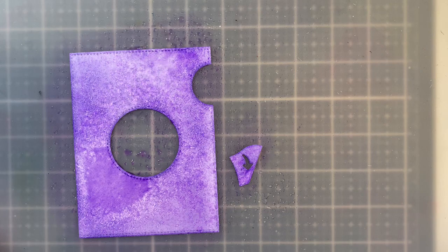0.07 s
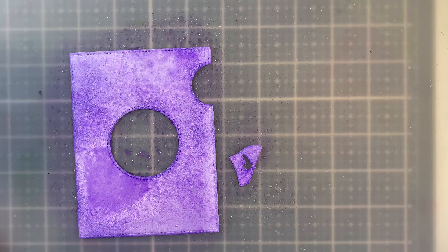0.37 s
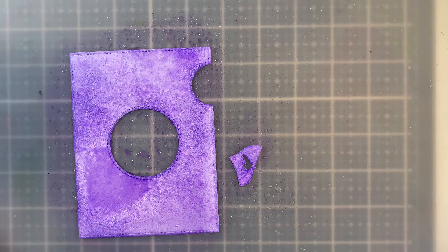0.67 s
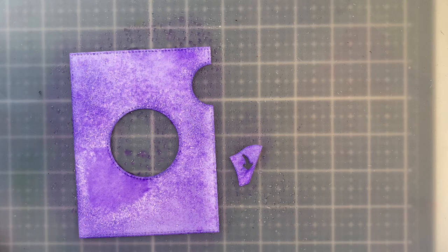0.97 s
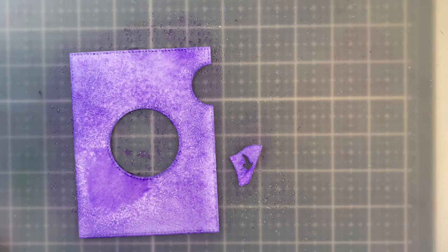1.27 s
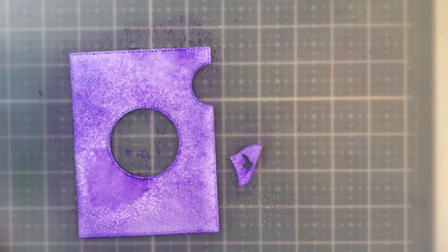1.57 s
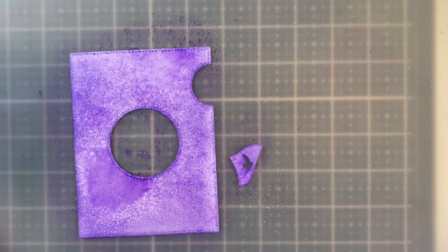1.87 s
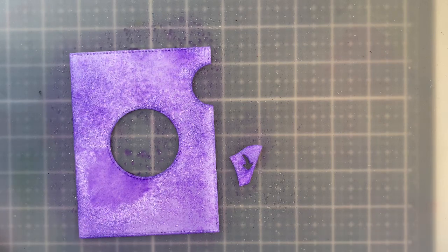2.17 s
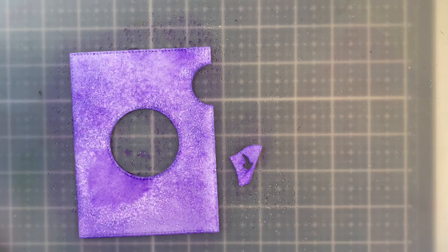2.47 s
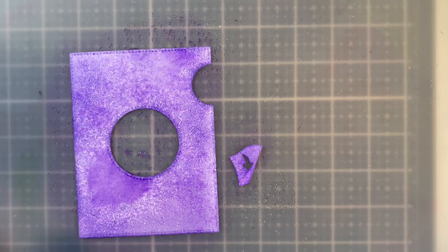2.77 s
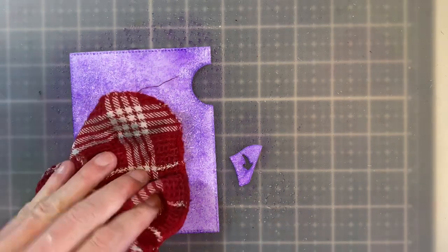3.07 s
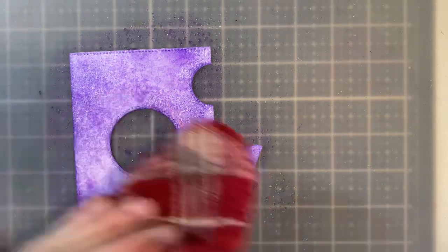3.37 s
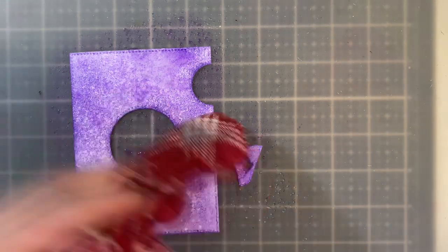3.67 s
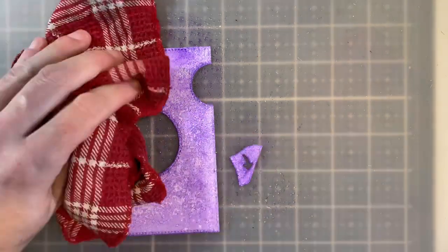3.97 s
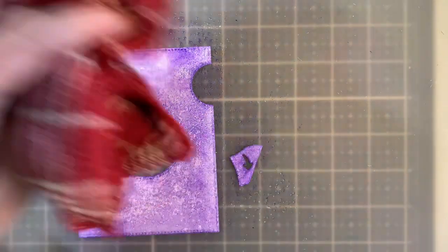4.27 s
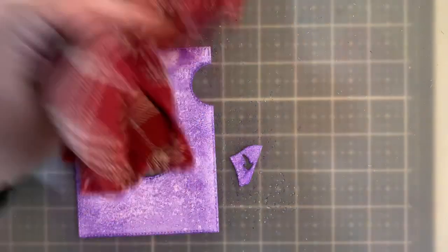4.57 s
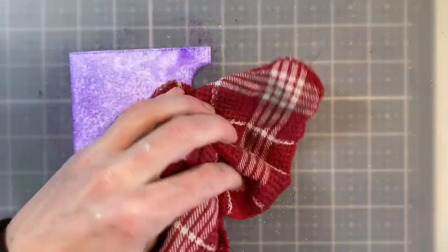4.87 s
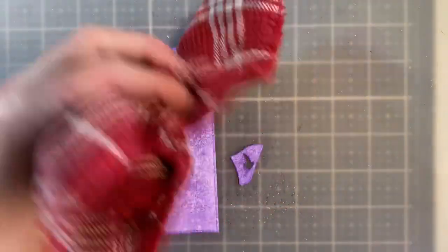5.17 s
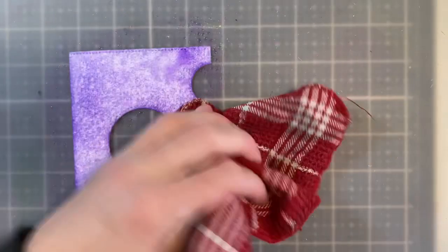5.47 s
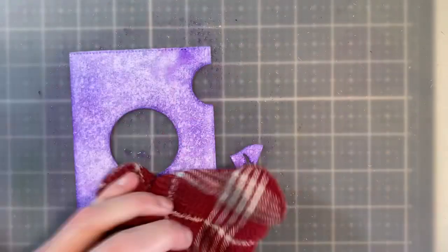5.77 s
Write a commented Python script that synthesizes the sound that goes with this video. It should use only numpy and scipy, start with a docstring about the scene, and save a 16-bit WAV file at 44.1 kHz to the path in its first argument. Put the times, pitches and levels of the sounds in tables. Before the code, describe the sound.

Tools are put down on a work table with a loud thud, followed by seven muffled pats of cloth and faint rustling.

```python
"""Light clicks and knocks sound as tools are put down on a work table in a small room; at one second
a heavy blow sends a bending wave through the top and sets its modes ringing. Then a bunched cloth is
dabbed seven times onto card on a craft mat: each dab crushes the fibres and thumps the table.
Between the dabs, friction makes cloth and sleeve swish and snag in short strokes,
and the table rumbles faintly under the arm's weight."""
import sys
import numpy as np
from scipy import signal
from scipy.fft import rfft, irfft, next_fast_len
from scipy.io import wavfile
from scipy.ndimage import map_coordinates

SR = 44100
rng = np.random.default_rng(int(sys.argv[2]) if len(sys.argv) > 2 else 0)


def digitize_waveform(pressure):
    """Quantize a signal to 16-bit integers and store it at the path in sys.argv[1].

    Rows of a 2-D input are taken as channels; values are limited to [-1, 1].
    """
    field = np.atleast_2d(pressure).T
    bounded = np.clip(field, -1, 1)
    quanta = np.round(bounded * 32767).astype(np.int16)
    wavfile.write(sys.argv[1], SR, quanta)


N = 264688
TIME = np.arange(N) / SR
AGE = np.arange(SR // 2) / SR  # seconds since a contact

# spectra of a hard crack, the soft cloth wad and rubbed card: frequency_hz, level_db
CRACK = [(400, -11), (1500, 5), (2150, 6), (2800, 6.5), (3600, 4), (5000, 1), (8000, -8), (11000, -13.5),
         (13000, -25.5), (16000, -24)]
WAD = [(60, -49), (250, 12.5), (400, 9.5), (550, -0.5), (1000, -6.5), (2500, -34.5), (8000, -22)]
CARD = [(300, -39), (780, -10.5), (1200, 1.5), (1750, -0.5), (2050, 3.5), (2400, -15), (3000, -9),
        (3450, -0.5), (3900, -8), (8000, -33)]
# left-right likeness of direct and of diffuse sound: frequency_hz, correlation
DIRECT = [(60, 1), (150, 1), (300, 0.31), (700, 0.22), (1400, 0.81), (3000, 0.083), (7000, 0.1),
          (15000, 0.49)]
DIFFUSE = [(60, 0.6), (150, .93), (300, 1), (650, 0.35), (1400, -.15), (3000, -0.78), (15000, 1)]


def blow(start_s=0.9872, level_db=-11, dispersion=0.22, right_lag_s=0.00044):
    """Dispersion: a heavy tool's bending wave arrives treble first, as a fast falling sweep."""
    # spectrum of the impact: frequency_hz, level_db
    spectrum = [(25, -39), (70, -12.5), (125, 1), (165, 0), (230, -9.5), (350, -8), (560, -16.5),
                (880, -13), (1300, -34), (2000, -49.5), (6000, -92.5)]
    hz = np.fft.rfftfreq(len(AGE), 1 / SR)
    phase = 4 * np.pi * dispersion * np.sqrt(hz)  # group delay = dispersion / sqrt(hz)
    phase = phase + 2 * np.pi * hz * right_lag_s * np.array([[0], [1]])
    wave = irfft(amp(along(spectrum, hz)) * np.exp(-1j * phase), len(AGE))
    sweep = peaked(wave * np.cos(np.pi * AGE) ** 2)
    modes = peaked(table_modes(low_hz=60, high_hz=4000) * onset(0.0056))
    rattle = noise(CRACK, DIFFUSE, len(AGE), grit=0.26) * fade(AGE, 0.3)  # scattered round the room
    out = np.zeros((2, N))
    add(out, start_s, room(sweep, wet_db=-15))
    add(out, start_s + 0.0091, amp(-13) * modes + amp(-37) * rattle)
    return amp(level_db) * out


def knocks():
    """Impact excitation: a contact clacks, cracks and rings the modes, then its weight thumps."""
    # tools knocking on the mat, and the cloth slapping the card:
    # start_s, level_db, clack_hz, treble_db, rise_s, thump_db, swing_hz
    contacts = [(0.134, -40, 370, -21, 0.0022, -36.5, 228), (0.153, -48, 523, -8.5, 0.0022, -35, 213),
                (0.920, -43, 616.5, -5, 0.0044, -35, 210.3), (0.946, -43, 600, -9, 0.005, -31, 200),
                (0.973, -38, 597, -15, 0.0023, -30, 170), (0.993, -20.5, 948, -10.5, .0015, -35.5, 300),
                (1.169, -42.5, 650, -17.5, 0.00804, -29, 135),
                (1.203, -38.5, 680, -21.5, 0.0017, -31, 179.4),
                (1.401, -49.5, 740, -19.5, 0.0041, -38, 140),
                (1.574, -55.5, 616, -31.5, .013, -44.5, 139.4),
                (1.825, -45.5, 1120, -45, 0.0044, -53.5, 257),
                (1.843, -47.5, 1146, -45, 0.0039, -52, 209.6), (1.881, -54.5, 920, -29, 0.0027, -48.5, 204),
                (2.243, -42, 762, -28, 0.00072, -48, 86), (2.851, -48.5, 757, -1, 0.0017, -58.5, 120)]
    # spectrum of the dull clack: pitch_ratio, level_db
    clack_shape = [(.1, -15.5), (.3, -2.5), (.6, 0), (1.2, -2.5), (1.7, -12), (2.6, -21.5), (5, -40),
                   (12, -74.5)]
    out = np.zeros((2, N))
    for start_s, level_db, clack_hz, treble_db, rise_s, thump_db, swing_hz in contacts:
        # a softer contact lasts longer and its weight reaches the table later
        t60_s, thump_lag_s = 0.04 + 5.5 * rise_s, 2.1 * rise_s
        contact = peaked(fade(AGE, t60_s) * onset(rise_s))
        clack = amp(-6) * noise(pitched(clack_shape, clack_hz), DIFFUSE, len(AGE))
        crack = amp(treble_db - 6) * noise(CRACK, DIFFUSE, len(AGE), grit=0.54)
        modes = amp(-14) * peaked(table_modes(low_hz=378, high_hz=5000) * onset(0.0021))
        add(out, start_s, amp(level_db) * (room(contact * (clack + crack), wet_db=-8) + modes))
        weight = thump(swing_hz, ring_db=-10) + amp(-23) * rocking()
        add(out, start_s + thump_lag_s, amp(thump_db) * weight)
    return out


def ticks(tonal_t60_s=0.032, tonal_below_hz=4000):
    """Damped resonance: tiny snaps of noise; the lower ones ring more purely the longer they last."""
    # tools, fingernails and card edges: start_s, level_db, pitch_hz, t60_s, left_over_right_db
    clicks = [(0.005, -47, 6150, 0.18, 0), (0.0729, -40, 2430, 0.018, -2), (0.0724, -43.5, 9700, 0.016, -2),
              (0.150, -53.5, 1946, 0.058, -2), (0.086, -45, 6860, .02, -4), (0.367, -51, 2120, 0.014, -4),
              (0.432, -55, 6350, 0.019, -7), (0.465, -62, 1880, 0.03, -6), (0.467, -64.5, 3400, .02, -15),
              (0.918, -46.5, 3720, 0.019, 6), (0.942, -46, 3750, .016, -4.5),
              (0.991, -23.5, 3460, 0.016, 4.5), (0.9935, -24, 7160, 0.0068, 1), (1.000, -33, 3657, .01, -4),
              (1.004, -47, 3480, 0.17, -7), (1.176, -50, 2514, 0.02, 0), (1.2336, -54, 1720, .012, -9),
              (1.303, -65, 2160, 0.054, -5), (1.403, -71, 4600, 0.066, -8), (1.416, -58, 3424, 0.043, -2.5),
              (2.669, -55, 2050, .049, -3), (2.8503, -38, 4730, 0.0091, -6), (3.318, -52, 806, 0.013, -1),
              (3.34, -46, 6580, 0.016, -3), (3.378, -55, 1950, 0.034, -4.5),
              (3.776, -57.5, 5150, 0.028, -8.5), (3.778, -50.5, 1650, 0.012, -7),
              (3.809, -48.5, 811, 0.024, -2), (3.831, -48, 3850, 0.0072, -10),
              (4.721, -54.5, 1500, .014, -3), (5.178, -45, 790, 0.012, -2.5),
              (5.187, -55.5, 1893, 0.021, -3), (5.662, -44.5, 2600, 0.0076, -2),
              (5.6646, -34.5, 5870, 0.00828, -5.5), (5.906, -54, 7500, .02, -6)]
    # spectrum of a snap: pitch_ratio, level_db
    snap_shape = [(.12, -28), (.5, -13), (.85, -2.5), (1, 2), (1.2, -4), (1.7, -17.5), (3, -31.5), (6, -56)]
    out = np.zeros((2, N))
    for start_s, level_db, pitch_hz, t60_s, pan_db in clicks:
        tone_share = 0.5 * min(t60_s / tonal_t60_s, 1) * (pitch_hz < tonal_below_hz)
        ping = np.sqrt(2) * np.sin(2 * np.pi * pitch_hz * AGE)
        snap = noise(pitched(snap_shape, pitch_hz), DIRECT, len(AGE))
        click = ((1 - tone_share) * snap + tone_share * ping) * fade(AGE, t60_s)
        add(out, start_s, amp(level_db - 6) * room(click * sides(pan_db), wet_db=-8))
    return out


def dabs(crest_s=0.15, release_s=0.013, lead_s=0.005):
    """Compression: fibres crackle ever louder until the wad is flat and the hand's weight lands."""
    # the cloth pressed flat: landing_s, crush_db, body_db, rise_s, thump_db, swing_hz, ring_db
    presses = [(2.88, -49, -11, 0.065, -40, 95.4, -4.5), (3.355, -47.5, 3.5, .009, -45, 118.2, -7.5),
               (3.845, -45.5, -2.5, .012, -36, 107, 6), (4.280, -52, 4, 0.031, -34.5, 142.4, 0),
               (4.745, -54.5, 6, 0.0149, -44.5, 198, -1), (5.2152, -50.5, 7, 0.013, -23, 190, -2),
               (5.680, -51.5, 6, 0.0144, -44.5, 134, 5)]
    # spectrum of crushed fibres: frequency_hz, level_db
    crush = [(200, 1), (1200, -1.5), (2500, -5.5), (5500, -3.5), (9000, -11.5), (15500, -10)]
    out = np.zeros((2, N))
    for landing_s, crush_db, body_db, rise_s, thump_db, swing_hz, ring_db in presses:
        pressure = np.exp(np.minimum((AGE - crest_s) / rise_s, (crest_s - AGE) / release_s))
        fibres = amp(-10) * noise(crush, DIRECT, len(AGE), grit=0.16)
        body = amp(body_db - 9) * noise(WAD, DIRECT, len(AGE))
        start_s = landing_s - lead_s - crest_s  # the fibres flatten just before the thump
        add(out, start_s, amp(crush_db) * room(pressure * (fibres + body), wet_db=-7))
        push = amp(crush_db + 4) * rocking()  # a harder crush pushes the table deeper
        add(out, landing_s, amp(thump_db) * thump(swing_hz, ring_db - 12) + push)
    return out


def thump(swing_hz, ring_db, width_cycles=0.92, glide=0.1, ring_rise_s=0.017):
    """Transient bending: the loaded top sags, swings about twice and leaves its low modes ringing."""
    # early echoes of the thump from the nearby wall and ceiling: delay_s, level_db
    reflections = [(0.0237, -14.5), (.031, -13.5)]
    cycles = swing_hz * AGE * np.array([[1], [2]])  # fundamental and octave
    phase = (1 + glide) * np.log1p(glide * cycles) / glide  # dispersion slows the swing
    envelope = cycles * np.exp(-(cycles / width_cycles) ** 2 / 2)
    fundamental, octave = -peaked(envelope * np.sin(2 * np.pi * phase))
    swing = fundamental + amp(-17) * octave
    ringing = amp(ring_db) * table_modes(low_hz=40, high_hz=239.2) * onset(ring_rise_s, power=2)
    echoes = sum(amp(db) * np.interp(AGE - delay_s, AGE, swing, left=0) for delay_s, db in reflections)
    return (room(swing, wet_db=-14) + ringing + echoes) * sides(0.88)


def table_modes(low_hz, high_hz, skew_hz=700):
    """Modal superposition: damped sines between two corners; higher ones differ more in stereo phase."""
    # modes of the table top: pitch_hz, level_db, t60_s
    modes = [(126.5, -4.5, 0.072), (151.54, 3, 0.36), (229, -6.5, 0.25), (249.6, -4.5, 0.27),
             (282, -6, 0.18), (353, -1.5, 0.2), (372, -7, 0.3), (450, -10.5, 0.28), (563.6, -12.5, .24),
             (614, -7.5, .22), (784, -20.5, 0.16), (794, -14.5, 0.043), (924, -14.5, .18),
             (1110, -22, 0.14), (1270, -20.5, 0.12), (1478, -22.5, .18), (1930, -19, .13),
             (2200, -18.5, 0.22), (2410, -33.5, .2), (3600, -33, .2)]
    hz, level_db, t60_s = np.transpose(modes)[:, :, None]
    strength, skew, phase = rng.standard_normal((len(modes), 3)).T[:, :, None]
    gain = amp(level_db + 2 * strength) / (1 + (hz / high_hz) ** 4) / (1 + (low_hz / hz) ** 2)
    envelope = gain * fade(AGE, t60_s)
    angle = 2 * np.pi * hz * AGE + phase
    offset = np.minimum(hz / skew_hz, 1) * skew
    return np.array([(envelope * np.sin(angle + side * offset)).sum(0) for side in (1, -1)])


def rocking(pitch_hz=52, rise_s=0.0061, t60_s=0.22):
    """Damped oscillation: the whole table rocks under a weight and soon settles."""
    return peaked(np.sin(2 * np.pi * pitch_hz * AGE) * fade(AGE, t60_s) * onset(rise_s))


def arm(lean_stretch=1.6):
    """Power summation: overlapping strokes give envelopes of sliding speed and weight on the table."""
    # strokes of cloth and sleeve: peak_s, swish_db, rise_s, fall_s, weight_db
    strokes = [(0.004, -57.5, 0.022, 0.025, -64), (0.615, -85.5, 0.013, .025, -73.5),
               (1.668, -79.5, 0.022, 0.026, -70), (1.906, -81, .05, .04, -62.5),
               (2.191, -70.5, 0.04, 0.086, -62), (2.43, -69.5, 0.11, .15, -64),
               (2.65, -68.5, 0.12, 0.018, -64.5), (2.83, -72, 0.0581, 0.038, -64.5),
               (3.08, -71, .07, 0.026, -75), (3.545, -74.5, 0.06, 0.027, -65.5),
               (3.72, -85.5, 0.078, .15, -72), (4.03, -70.5, 0.035, 0.016, -68),
               (4.22, -75, 0.2, 0.19, -64), (4.505, -68.5, 0.044, 0.021, -73),
               (4.588, -79.5, .03, 0.03, -63.5), (4.971, -76.5, 0.068, 0.064, -59.5),
               (5.45, -76, 0.091, 0.057, -70), (5.885, -72.5, 0.051, 0.056, -67)]
    speed_power, weight_power = np.zeros((2, N))
    for peak_s, swish_db, rise_s, fall_s, weight_db in strokes:
        speed_power += (amp(swish_db) * bell(peak_s, rise_s, fall_s)) ** 2
        lean = bell(peak_s, lean_stretch * rise_s, lean_stretch * fall_s)  # outlasts the slide
        weight_power += (amp(weight_db) * lean) ** 2
    return np.sqrt(speed_power), np.sqrt(weight_power)


def swish(speed):
    """Sliding friction: fabric hisses a little to the right, and the card resonates as it catches."""
    # spectrum of sliding cloth: frequency_hz, level_db
    cloth = [(100, -30), (400, -8.5), (750, 5.5), (1200, 0.5), (2000, 1.5), (2700, 2), (3500, -0.5),
             (6000, 1.5), (8500, -2), (12000, 1.5), (15500, -3.5)]
    left, right = noise(cloth, DIRECT, grit=0.14)
    right = coloured(right, [(600, 2.0), (2000, 6.0), (4500, 8.5), (8500, 1)])
    fabric = amp(0.5 + wobble(30)) * np.array([left, right])
    card = amp(-8 + 5.5 * wobble(30)) * noise(CARD, DIRECT, grit=0.77) * sides(0.17)
    return speed * (fabric + card)


def snags(speed, per_s=45, scatter_db=4, t60_s=0.014):
    """Stick-slip: threads catch on the card's edge and let go at random, louder in a faster stroke."""
    slips = rng.random(N) < per_s / SR
    strength = amp(scatter_db * np.clip(rng.standard_normal(N), -2, 2))
    bursts = signal.fftconvolve(slips * strength, fade(AGE, t60_s))[:N]
    return speed * amp(-8) * unit(bursts * noise(CARD, DIRECT))


def scuffing(weight):
    """Friction under load: the wad shifts unevenly beneath the hand with a soft, dull noise."""
    return weight * amp(-15 + 4 * wobble(25)) * noise(WAD, DIRECT)


def background(weight, rest_db=-67.5, swell_db=-45, crest_s=1.12, rise_s=0.044, t60_s=1.0):
    """Forced vibration: table and room rumble under the arm and after the blow, over a faint hiss."""
    # spectra of the rumble and the hiss: frequency_hz, level_db
    rumble = [(12, -61), (20, -34), (35, -12), (75, -7.5), (139, -3), (201, -9.5), (231, -10), (252, -16.5),
              (307, -20.5), (535, -36), (600, -31), (780, -60), (1320, -120)]
    hiss = [(300, -4), (600, -9), (1000, -15.5), (2000, -21), (7000, -23.5), (11000, -32.5), (16000, -36)]
    growth = np.exp(np.minimum(TIME - crest_s, 0) / rise_s)
    swell = amp(swell_db) * growth * fade(np.maximum(TIME - crest_s, 0), t60_s)
    level = np.sqrt(amp(rest_db) ** 2 + weight ** 2 + swell ** 2) * amp(1.2 * wobble(21))
    return level * noise(rumble, DIRECT) * sides(0.65) + amp(-79) * noise(hiss, DIRECT)


def room(x, wet_db, build_s=0.0054):
    """Reverberation: diffuse reflections build up behind the sound and die faster in the treble."""
    # reverberation time: frequency_hz, t60_s
    decay = [(60, 0.097), (150, 0.42), (400, 0.2), (1200, .28), (4000, 0.098), (12000, 0.14)]
    hz, t, bands = signal.stft(spread(rng.standard_normal((2, len(AGE))), DIFFUSE), SR, nperseg=256)
    tail = signal.istft(bands * fade(t, along(decay, hz)[:, None]), SR, nperseg=256)[1][:, :len(AGE)]
    tail = unit(tail * onset(build_s, power=2)) / np.sqrt(len(AGE))
    return x + amp(wet_db) * signal.fftconvolve(np.atleast_2d(x), tail, axes=1)[:, :x.shape[-1]]


def noise(spectrum, correlation, size=N, grit=0):
    """Stereo noise of rms 1; grit is the power share of separate grains, as of fibres slipping."""
    grains = np.sqrt(60) * (rng.random(size) < 1 / 60)
    pair = rng.standard_normal((2, size)) * (np.sqrt(1 - grit) + np.sqrt(grit) * grains)
    return unit(coloured(spread(pair, correlation), spectrum))


def coloured(x, spectrum):
    """Minimum-phase filter with the given spectrum."""
    size = 2 * next_fast_len(x.shape[-1] // 2 + 4096)
    cepstrum = irfft(np.log(amp(along(spectrum, np.fft.rfftfreq(size, 1 / SR)))))
    cepstrum[1:size // 2] *= 2
    cepstrum[size // 2 + 1:] = 0
    return irfft(rfft(x, size) * np.exp(rfft(cepstrum)))[..., :x.shape[-1]]


def spread(pair, correlation):
    """Mid-side mixing gives two independent signals a set left-right correlation."""
    size = next_fast_len(pair.shape[-1])
    angle = np.arccos(np.clip(along(correlation, np.fft.rfftfreq(size, 1 / SR)), -1, 1)) / 2
    mid, side = irfft(rfft(pair, size) * [np.cos(angle), np.sin(angle)], size)[:, :pair.shape[-1]]
    return np.array([mid + side, mid - side])


def pitched(shape, pitch_hz):
    """A spectrum shape placed on a pitch."""
    return np.array(shape) * [pitch_hz, 1]


def along(points, hz):
    """Interpolation on a log frequency axis."""
    frequencies, values = np.transpose(points)
    return np.interp(np.log(hz + 1), np.log(frequencies), values)


def bell(peak_s, rise_s, fall_s):
    """A lopsided bell envelope."""
    distance = np.maximum((peak_s - TIME) / rise_s, (TIME - peak_s) / fall_s)
    return np.exp(-np.minimum(distance, 10) ** 1.4 / 2)


def onset(rise_s, power=1):
    """Rise from 0 towards 1 after a contact."""
    return 1 - np.exp(-(AGE / rise_s) ** power)


def fade(t, t60_s):
    """Exponential decay, 60 dB in t60_s."""
    return np.exp(-np.log(1000) * t / t60_s)


def wobble(knots_per_s):
    """A smooth random curve."""
    return map_coordinates(rng.standard_normal(400), [TIME * knots_per_s], mode="mirror")


def amp(db):
    """Decibels to gain."""
    return 10 ** (np.asarray(db) / 20)


def sides(db):
    """Channel gains with left above right by db."""
    return amp([[db / 2], [-db / 2]])


def unit(x):
    """Scaled to rms 1."""
    return x / np.sqrt(np.mean(x ** 2) + 1e-20)


def peaked(x):
    """Scaled to peak 1."""
    return x / np.abs(x).max()


def add(track, start_s, sound):
    """Mix a sound into a track."""
    start = max(round(start_s * SR), 0)
    track[..., start:start + sound.shape[-1]] += sound[..., :N - start]


def scene():
    """Superposition: everything on the table, heard from just above it."""
    speed, weight = arm()
    impacts = blow() + knocks() + ticks() + dabs()
    return impacts + swish(speed) + scuffing(weight) + background(weight) + snags(speed)


def record(dry, top_hz=15850):
    """Band limiting: nothing above top_hz passes."""
    size = next_fast_len(N + SR // 4)
    return irfft(rfft(dry, size) * (np.fft.rfftfreq(size, 1 / SR) < top_hz), size)[:, :N]


dry = scene()
out = record(dry)
digitize_waveform(out)
```